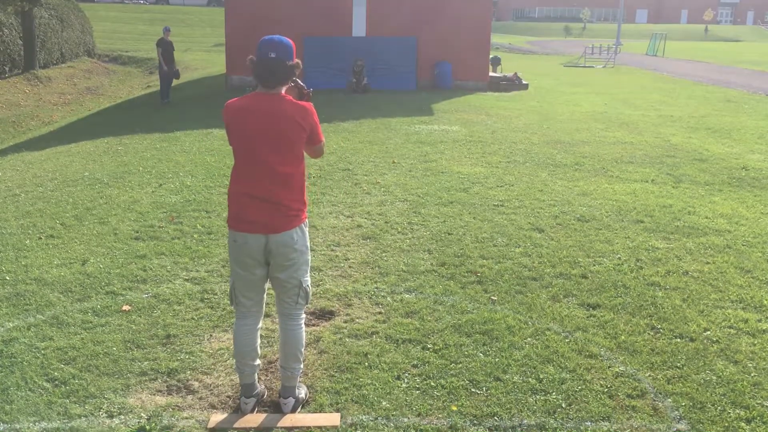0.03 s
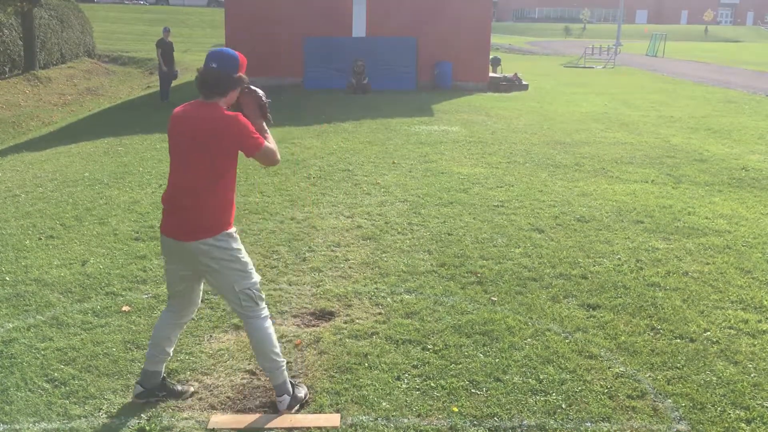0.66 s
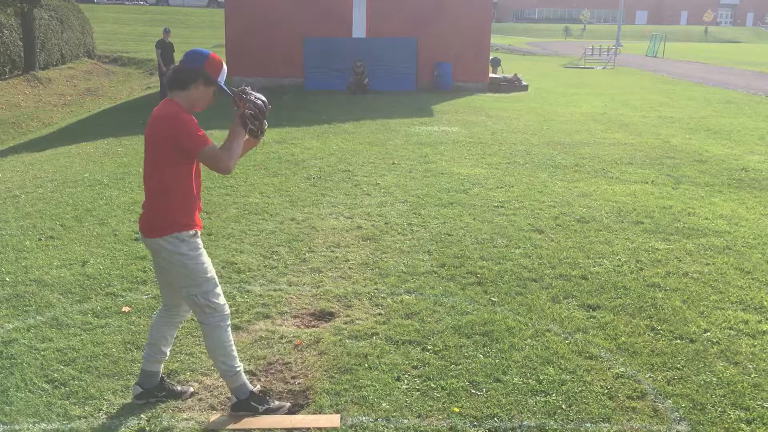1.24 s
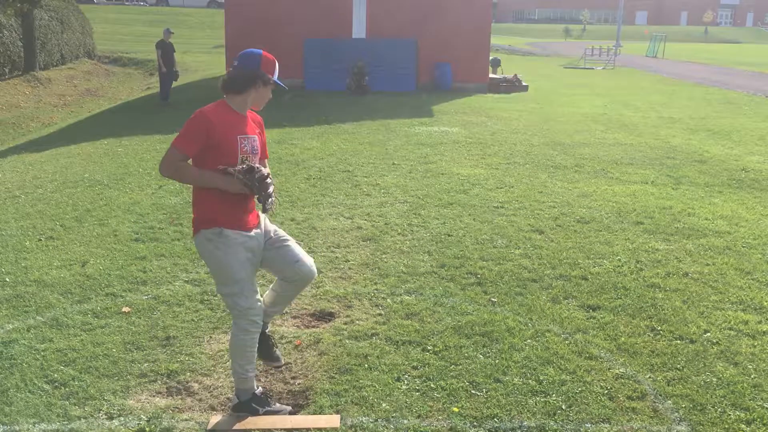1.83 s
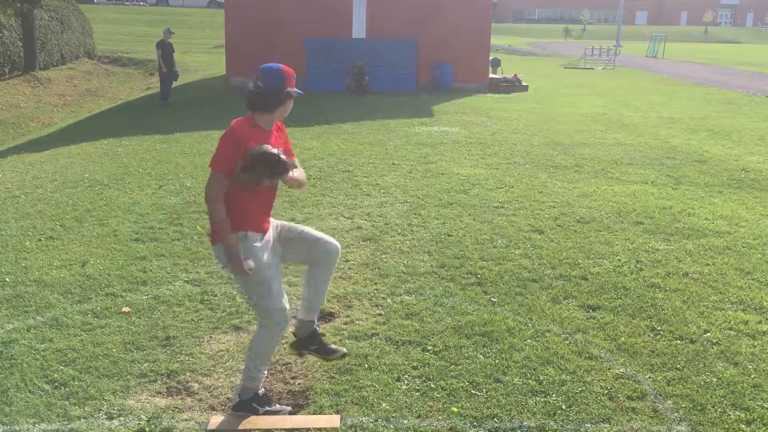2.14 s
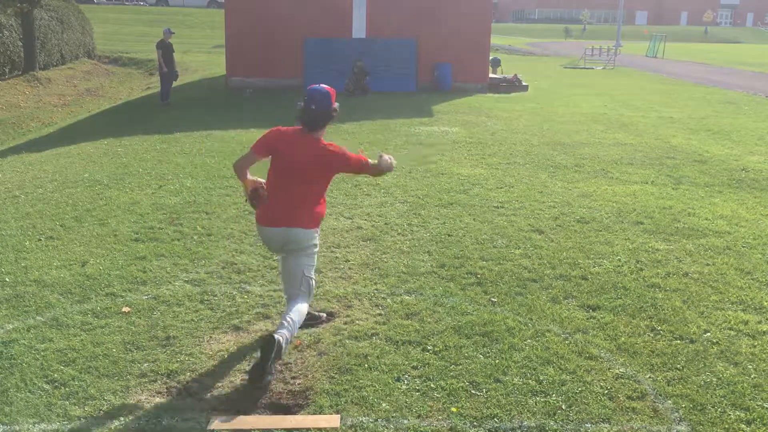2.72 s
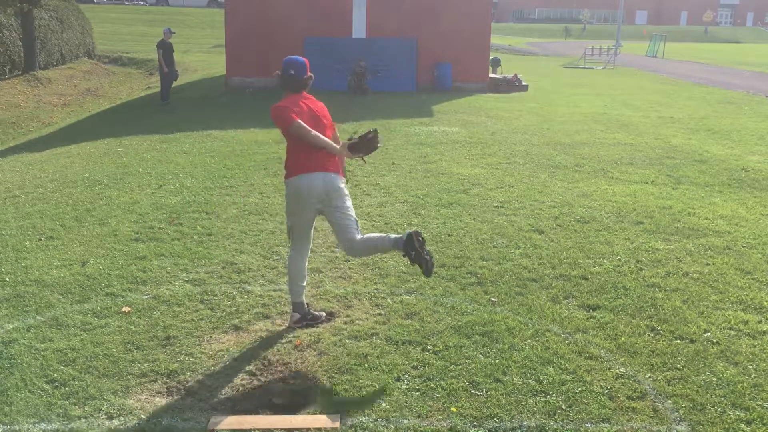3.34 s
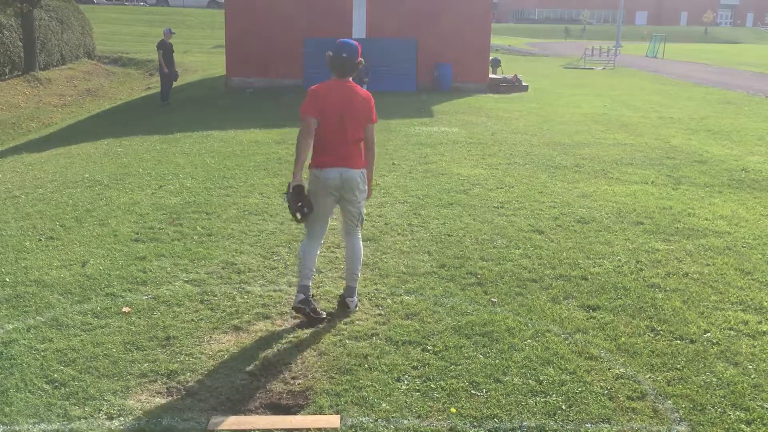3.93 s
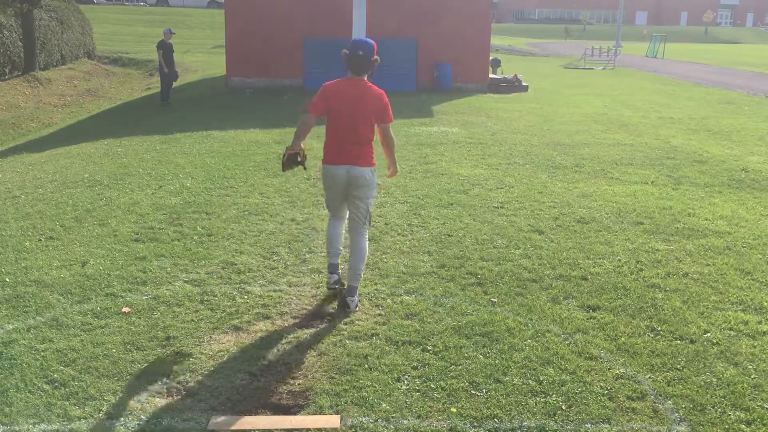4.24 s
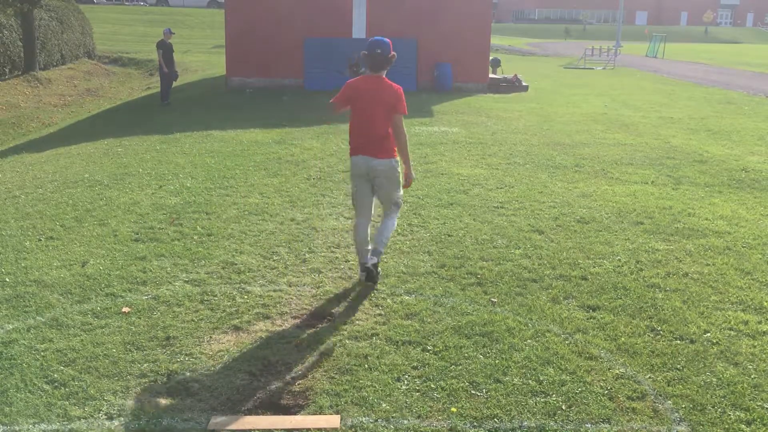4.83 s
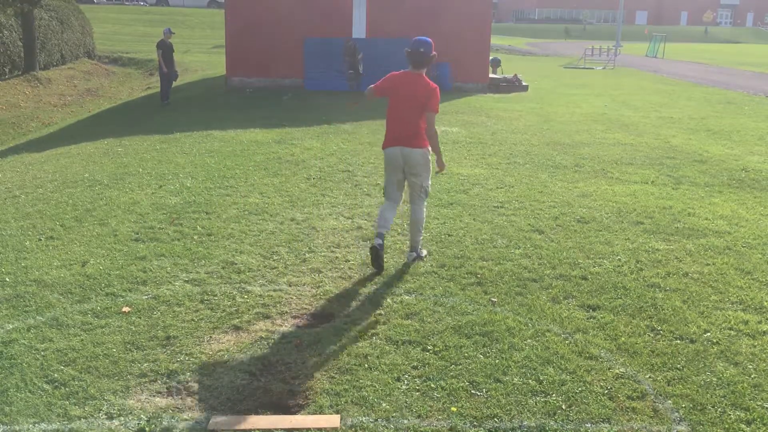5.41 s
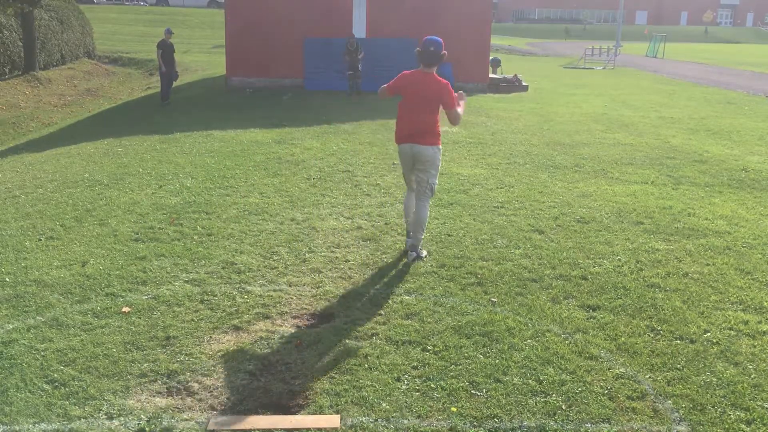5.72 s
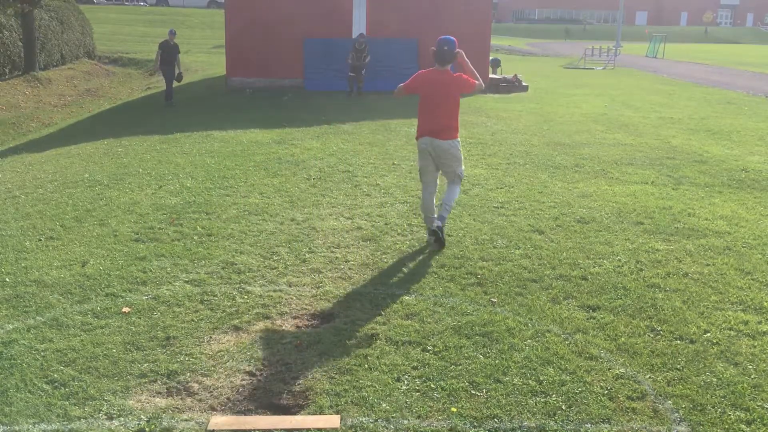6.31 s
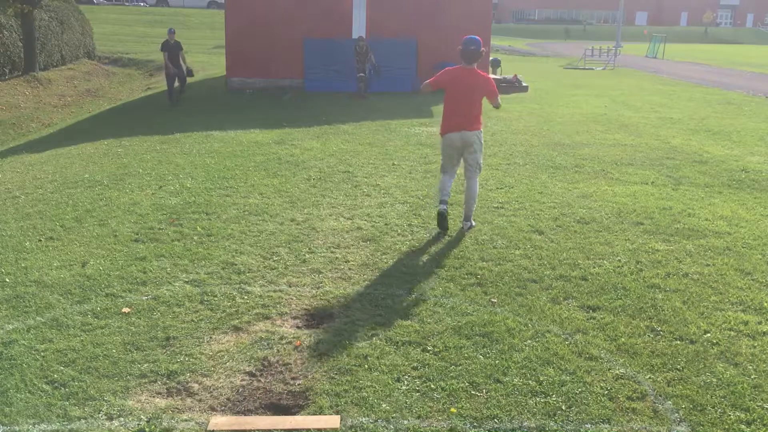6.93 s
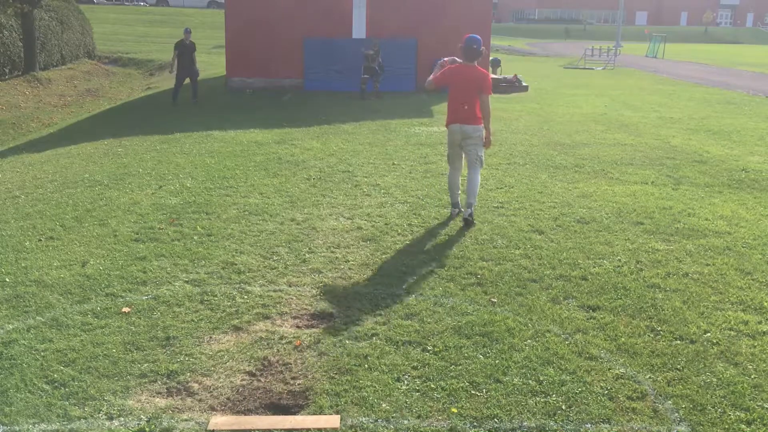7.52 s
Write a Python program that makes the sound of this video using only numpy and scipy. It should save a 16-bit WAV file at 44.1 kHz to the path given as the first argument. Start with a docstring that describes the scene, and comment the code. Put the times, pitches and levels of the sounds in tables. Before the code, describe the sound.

One sharp smack of a baseball hitting a leather glove stands out about halfway through, heard from behind the pitcher on an open field and thrown back briefly by a wall. Before it, gusts buffet and thump the microphone and shoes lightly scrape the dirt. Afterwards the wind eases a little, and a few small cleat ticks and soft scuffs follow. A distant town hums faintly throughout.

```python
"""A baseball cracks into a catcher's leather mitt, heard from behind the mound on an open grass field. The ball
slaps the leather and pops the air out of the pocket; the wall behind him throws the sound back. The pitcher's
shoes scuff the dirt before and after the catch, and a few small ticks sound on either side of it. Wind buffets
and thumps the microphone throughout, over the faint hum of a distant town and one far car."""
import sys
import numpy as np
from scipy import signal
from scipy.fft import rfft, irfft, next_fast_len
from scipy.io import wavfile
from scipy.ndimage import uniform_filter1d

SR = 44100
rng = np.random.default_rng(int(sys.argv[2]) if len(sys.argv) > 2 else 0)


def store_pcm(level_fs):
    """Save levels as 16-bit WAV."""
    pcm = np.round(np.clip(level_fs, -1, 1) * 32767).astype(np.int16)
    wavfile.write(sys.argv[1], SR, np.atleast_2d(pcm).T)


N = 337806
TIME = np.arange(N) / SR
CATCH_S = 3.5195


def undb(db):
    """Decibels to gain."""
    return 10 ** (np.asarray(db) / 20)


def unit(x):
    """Scale to rms 1."""
    return x / np.sqrt(np.mean(x ** 2))


def curves(rows):
    """Columns of a table joined by straight lines in time."""
    times, *columns = np.transpose(rows)
    return [np.interp(TIME, times, column) for column in columns]


def noise(colour):
    """Noise of rms 1 with a spectrum through (frequency_hz, level_db) points."""
    hz, db = np.transpose(colour)
    size = next_fast_len(N, True)
    bins = np.fft.rfftfreq(size, 1 / SR)
    gain = undb(np.interp(np.log(bins + 1), np.log(hz), db))
    return unit(irfft(rfft(rng.standard_normal(size)) * gain, size)[:N])


def wander(rate_hz):
    """Smooth random drift of rms 1."""
    hold = max(int(SR / rate_hz), 1)
    steps = np.repeat(rng.standard_normal(N // hold + 1), hold)
    return unit(uniform_filter1d(steps, hold)[:N])


def even(x, window_s):
    """Take the slow swells out of a noise and keep its quick ones."""
    size = int(window_s * SR)
    power = uniform_filter1d(uniform_filter1d(x ** 2, size), size)
    return x / np.sqrt(power + 1e-9)


def impulse(start_s):
    """One instantaneous blow."""
    return signal.unit_impulse(N, int(round(start_s * SR)))


def fade(start_s, t60_s):
    """Envelope that jumps to 1, then loses 60 dB in t60_s."""
    age = TIME - start_s
    return (age >= 0) * np.exp(-np.log(1000) * np.clip(age / t60_s, 0, 10))


def resonate(x, hz, width_hz):
    """Two-pole resonance, gain 1 at its centre."""
    return signal.lfilter(*signal.iirpeak(hz, hz / width_hz, fs=SR), x + 1e-18)


def ring(x, hz, width_hz):
    """The same resonance twice: a rounded ring with steep skirts."""
    return resonate(resonate(x, hz, width_hz), hz, width_hz)


def wavelet(centre_s, hz, cycles):
    """A tone under a bell curve that falls to 1/e at `cycles` periods either side."""
    turns = (TIME - centre_s) * hz
    return np.cos(2 * np.pi * turns) * np.exp(-np.minimum((turns / cycles) ** 2, 100))


# Traffic far beyond the field: time_s, level_db
TOWN_LEVEL = [(0, -50.5), (1.8, -51), (2.6, -48), (3.3, -50), (4.1, -48), (5, -49.5), (6.3, -48),
              (7.66, -49)]
# Spectra of that traffic and of the open field's high hiss: frequency_hz, level_db
TOWN_COLOUR = [(100, 1), (450, 0), (680, 2), (800, -0.5), (1050, -0.5), (1250, -2), (1500, -3), (2050, -10),
               (2700, -11.5), (3700, -16), (5000, -23.5), (9000, -34)]
HISS_COLOUR = [(2000, -4.5), (4200, -1.5), (4900, -4.5), (5500, 4), (6500, 4.5), (7600, 0), (9600, 2),
               (10400, -4), (11200, 0.5), (16000, -2)]

def town():
    """A far, gently wavering wash of traffic with a steady hiss on top."""
    town_db, = curves(TOWN_LEVEL)
    traffic = noise(TOWN_COLOUR) * undb(town_db + 0.5 * wander(rate_hz=6))
    return traffic + undb(-62) * noise(HISS_COLOUR)


def far_car(centre_s, length_s, pitch_hz, level_db):
    """The tyres of one far car sing in a narrow band as it passes."""
    tyres = unit(ring(rng.standard_normal(N), pitch_hz, width_hz=260))
    return undb(level_db) * tyres * np.exp(-2 * ((TIME - centre_s) / length_s) ** 2)


# Wind on the microphone, a stronger stretch then a lighter one: time_s, buffet_db, flutter_db
WIND_STRENGTH = [
    [(0.0, -24.5, -30.5), (0.08, -16.5, -31), (0.17, -32.5, -32.5), (0.33, -22, -41.5),
     (0.39, -28.5, -27.5), (0.64, -19, -34.5), (0.74, -27.5, -25.5), (1.1, -23, -31), (1.17, -35, -49),
     (1.21, -18, -25.5), (1.54, -25.5, -27), (1.71, -25.5, -25), (1.86, -36, -48), (2.09, -26.5, -27),
     (2.19, -29.5, -35.5), (2.34, -26, -31.5), (2.39, -40, -52), (2.42, -30.5, -41.5), (2.61, -26, -32),
     (2.64, -31, -47), (2.91, -24.5, -30), (3.12, -25.5, -40.5), (3.14, -26.5, -30.5), (3.48, -24, -41)],
    [(3.58, -34.5, -48.5), (3.81, -28, -35), (4.01, -38.5, -48.5), (4.53, -28, -37.5), (4.58, -40, -38.5),
     (4.7, -22, -33), (4.77, -40, -58), (4.92, -42, -55), (4.95, -28, -42.5), (5.45, -27, -36.5),
     (5.85, -31.5, -42.5), (5.95, -26, -39), (6.03, -40, -62), (6.07, -20.5, -48), (6.12, -40, -65),
     (6.17, -27.5, -35), (6.27, -31.5, -60), (6.41, -30, -39), (6.73, -31.5, -47), (6.82, -43.5, -48),
     (6.95, -34, -58.5), (7.0, -27.5, -44), (7.52, -34.5, -50), (7.66, -38, -63)],
]
# Spectra of the deep buffet, the flutter and the tearing in strong gusts: frequency_hz, level_db
BUFFET_COLOUR = [(15, -44), (28, -20), (40, -12.5), (52, 1.5), (68, -0.5), (100, -5), (135, -14.5),
                 (200, -38), (400, -57), (1500, -110)]
FLUTTER_COLOUR = [(70, -19.5), (120, 0), (170, -2.1), (240, -9), (350, -17.5), (500, -31.5), (900, -45.5),
                  (4000, -110)]
TEARING_COLOUR = [(120, -7), (220, 0), (380, -5), (550, -6), (850, -19), (2000, -61), (6000, -95)]

def wind():
    """Big eddies rock the microphone; small ones flutter in bursts and tear brighter as they grow."""
    buffet_db, flutter_db = curves(np.vstack(WIND_STRENGTH))
    tearing_db = 1.467 * flutter_db
    puffs = unit(undb(2.5 * wander(rate_hz=17)))
    buffet = undb(buffet_db + 3.5) * even(noise(BUFFET_COLOUR), window_s=0.05)
    bursts = undb(4 * wander(rate_hz=60))
    flutter = undb(flutter_db + 2.5) * even(noise(FLUTTER_COLOUR) * bursts, window_s=0.057)
    tearing = undb(tearing_db - 3.5) * even(noise(TEARING_COLOUR) * bursts, window_s=0.031)
    return puffs * (buffet + flutter + tearing)


# Single hard eddies right on the microphone: centre_s, peak_db, pitch_hz
WIND_THUMPS = [(0.405, -18, 286), (1.206, -21.5, 254), (1.234, -15, 293), (1.463, -29, 300),
               (1.627, -12.5, 254), (1.687, -9, 220), (2.099, -18, 212), (2.917, -20.5, 202),
               (4.632, -22.5, 218), (5.187, -25, 200), (5.43, -28, 259), (5.555, -22, 240),
               (7.013, -27.5, 188)]

def wind_thumps():
    """Each hard eddy is one short push and pull of pressure."""
    out = np.zeros(N)
    for centre_s, peak_db, pitch_hz in WIND_THUMPS:
        spread = (np.pi * pitch_hz * (TIME - centre_s)) ** 2
        out += undb(peak_db) * (2 * spread - 1) * np.exp(-np.minimum(spread, 100))
    return out


# Shoes and cloth over the dirt and grass at the mound: centre_s, length_s, level_db
SCUFFS = [(2.495, 0.036, -58), (2.744, 0.041, -53), (2.787, 0.018, -53.5), (2.86, .022, -58),
          (2.936, 0.084, -56), (3.776, 0.033, -54.5), (5.158, 0.15, -61), (6.63, 0.07, -64),
          (6.995, 0.038, -62)]

def scuffs():
    """Each scuff is a swell of tiny gritty grains."""
    friction = noise([(2500, -28), (4500, -3), (6000, 3), (9000, 0.5), (13000, 4.5), (16000, -4)])
    grit = unit(friction * undb(2.1 * wander(rate_hz=700)))
    return grit * sum(undb(level_db) * np.exp(-2 * ((TIME - centre_s) / length_s) ** 2)
                      for centre_s, length_s, level_db in SCUFFS)


# Cleats, grit and gear on the field: start_s, level_db, low_hz, high_hz, high_share_db, width_ratio
TICKS = [(2.831, -56, 4500, 5970, 17, 0.41), (2.9505, -38, 10100, 13800, 8, 0.33),
         (3.7028, -46, 8200, 9100, -5.5, 0.14), (3.8305, -32, 3530, 6420, -1.5, 0.21),
         (4.357, -29.5, 1270, 3760, -2.5, .28), (4.623, -46, 3000, 4800, 1, 0.33),
         (7.331, -45, 5520, 13000, 10, 0.42)]

def ticks():
    """Small hard contacts, each ringing two short resonances."""
    out = np.zeros(N)
    for start_s, level_db, low_hz, high_hz, high_share_db, width_ratio in TICKS:
        low, high = (ring(impulse(start_s), hz, hz * width_ratio) for hz in (low_hz, high_hz))
        out += undb(level_db) * (low / low.max() + undb(high_share_db) * high / high.max())
    return out


# The catch off the padded wall behind the catcher and off a building: delay_s, peak_db, pitch_hz
WALL_ECHOES = [(0.0101, -14.5, 910), (0.0087, -24, 1460), (.0223, -33, 1400)]

def field_echoes():
    """Dull slaps come back from the wall; fence, bank and buildings scatter a weak, later wash."""
    slaps = sum(undb(peak_db) * wavelet(CATCH_S + delay_s, pitch_hz, cycles=0.64)
                for delay_s, peak_db, pitch_hz in WALL_ECHOES)
    bright = noise([(1000, -13), (3000, 4), (9000, -5), (16000, -6)])
    bright *= undb(-41) * fade(CATCH_S + 0.009, t60_s=0.026)
    near = noise([(120, -5), (350, 7), (550, 3), (900, -14), (1500, -6), (2500, -27), (9000, -30)])
    near *= undb(-25) * fade(CATCH_S + 0.013, t60_s=0.07)
    far = noise([(200, 17), (900, 3), (1800, 1.5), (2800, 3), (4200, -7), (6000, -6),
                 (9000, -14), (16000, -19)])
    build_up = np.clip((TIME - CATCH_S) / 0.051, 0, 1) ** 2
    decay = undb(-26) * fade(CATCH_S, t60_s=0.21) + undb(-49.5) * fade(CATCH_S, t60_s=2.0)
    lumps = undb(1.5 * wander(rate_hz=110))  # separate surfaces make the wash uneven
    return slaps + bright + near + far * build_up * decay * lumps


def pocket(pitch_hz, contact_s, level_db):
    """The hollow of the glove pops low for as long as the ball is sinking into it."""
    age = TIME - CATCH_S
    squeeze = np.sin(np.pi * np.clip(age / contact_s, 0, 1))
    return -undb(level_db) * squeeze * np.sin(2 * np.pi * pitch_hz * age)


# Resonances of the mitt, a pitch's length from the microphone: pitch_hz, width_hz, relative_db
LEATHER_MODES = [(850, 220, 11.5), (1380, 330, 11), (2650, 500, 4), (4250, 350, -4), (5400, 350, 4),
                 (6620, 560, 12), (8900, 1400, 5.5), (10900, 900, -2), (14000, 1300, -2.5)]
# Spectrum of its crackling leather: frequency_hz, level_db
CRACKLE_COLOUR = [(400, -4), (1300, 2), (2200, -3), (4000, -6.5), (7000, -.5), (10000, -1.5), (14500, -6),
                  (17000, -22)]

def mitt():
    """The ball brushes the rim, slaps the leather, which crackles, and squeezes air from the pocket."""
    blow = undb(-1) * impulse(CATCH_S)
    slap = sum(undb(relative_db) * resonate(blow, pitch_hz, width_hz)
               for pitch_hz, width_hz, relative_db in LEATHER_MODES)
    grain = even(noise(CRACKLE_COLOUR), window_s=0.001)
    brush = undb(-29) * fade(CATCH_S - 0.0085, t60_s=0.011)
    snap = undb(-13) * fade(CATCH_S, t60_s=0.0045)
    creak = undb(-30) * fade(CATCH_S, t60_s=0.025)
    pop = pocket(pitch_hz=256, contact_s=0.0061, level_db=-10)
    return slap + grain * (brush + snap + creak) + pop


def scene():
    """Everything as it reaches the one microphone behind the mound."""
    distance = town() + far_car(centre_s=6.3, length_s=0.98, pitch_hz=1034, level_db=-58)
    gusts = wind() + wind_thumps()
    catch = mitt() + field_echoes()
    return (distance + gusts + scuffs() + ticks() + catch)[None]


def record(dry):
    """The recorder cuts the top steeply."""
    top_hz = 15800
    return signal.sosfilt(signal.ellip(10, 0.2, 70, top_hz, fs=SR, output="sos"), dry)


dry = scene()
out = record(dry)
store_pcm(out)
```